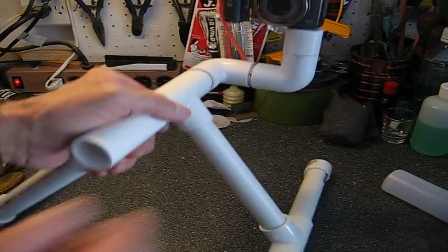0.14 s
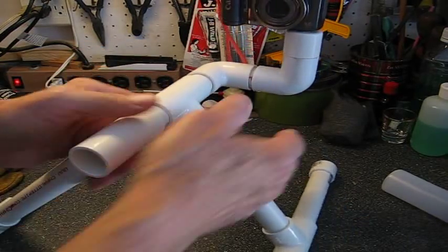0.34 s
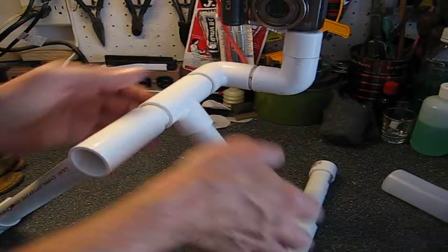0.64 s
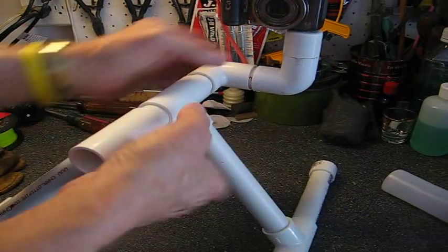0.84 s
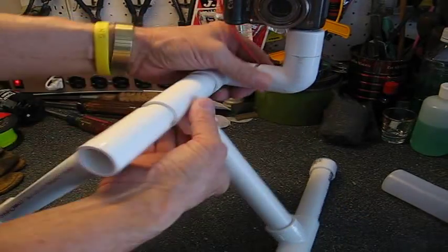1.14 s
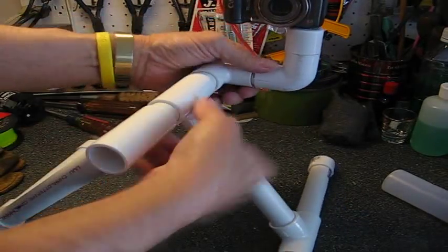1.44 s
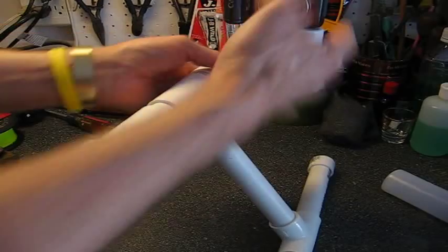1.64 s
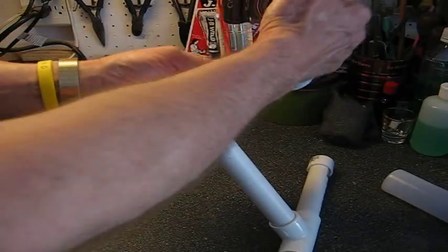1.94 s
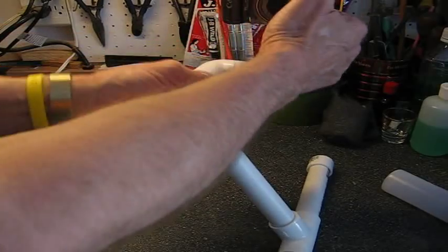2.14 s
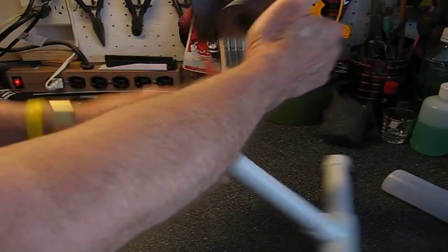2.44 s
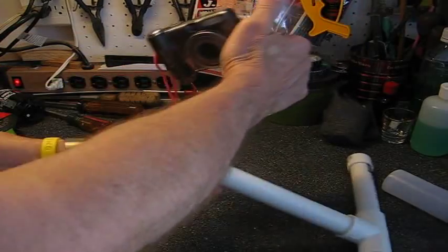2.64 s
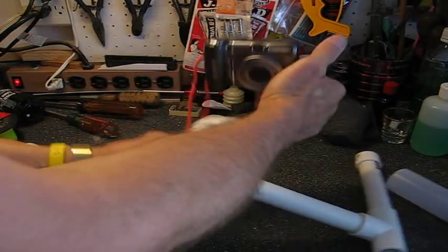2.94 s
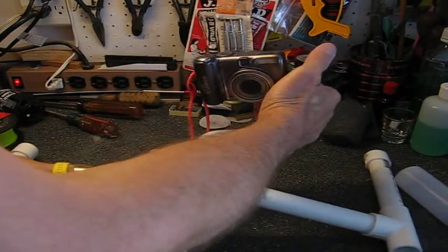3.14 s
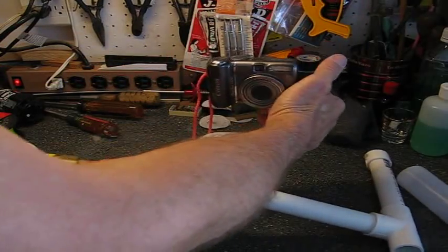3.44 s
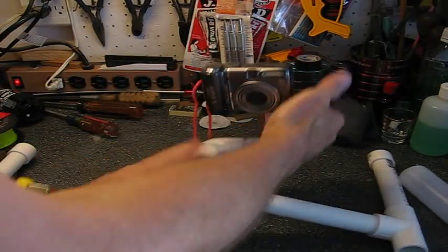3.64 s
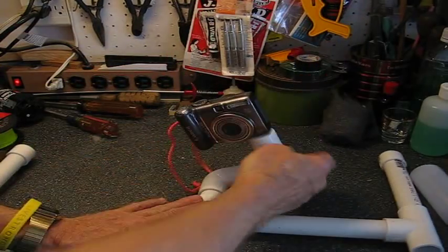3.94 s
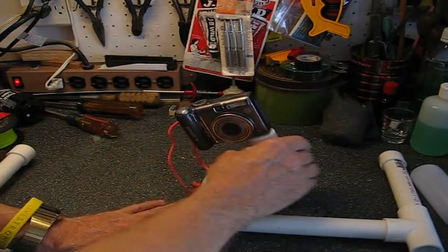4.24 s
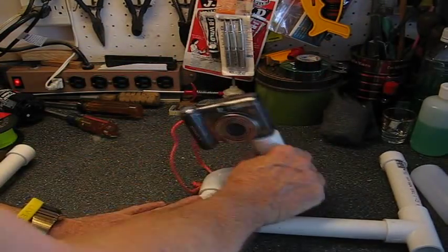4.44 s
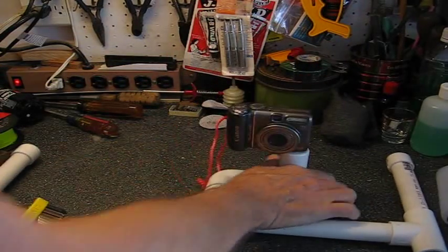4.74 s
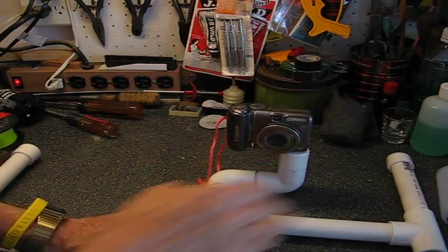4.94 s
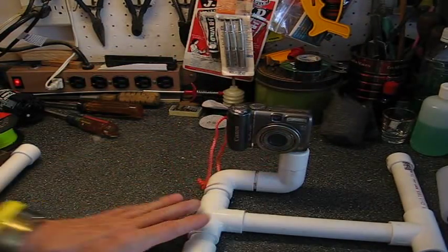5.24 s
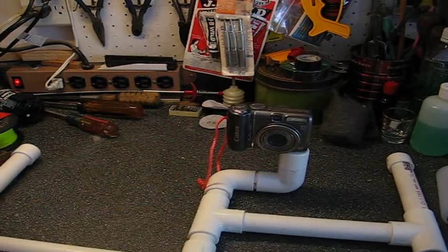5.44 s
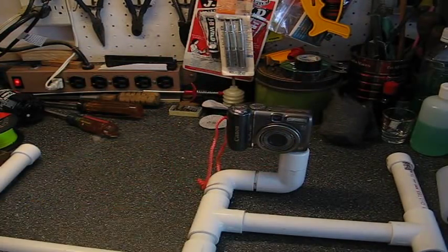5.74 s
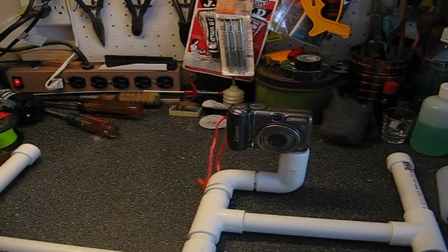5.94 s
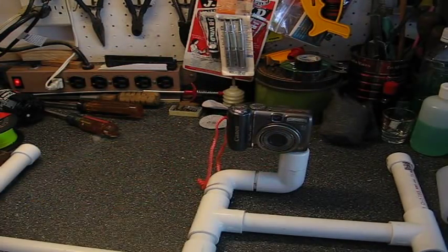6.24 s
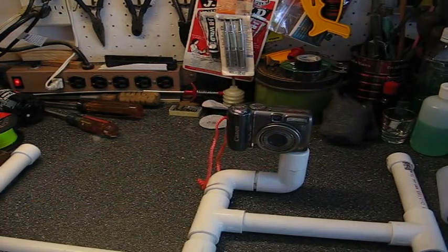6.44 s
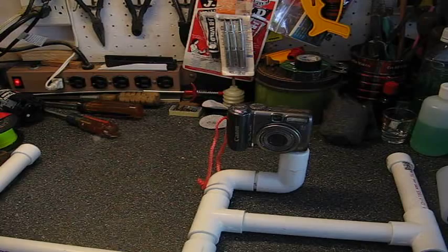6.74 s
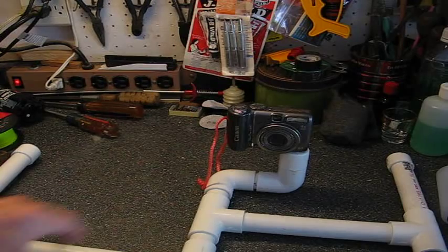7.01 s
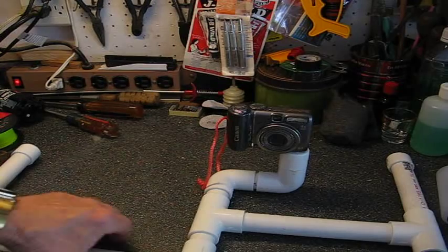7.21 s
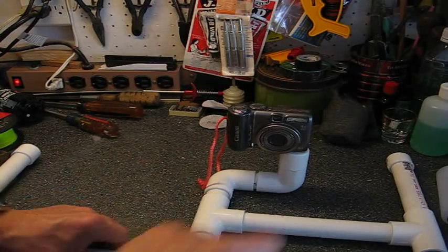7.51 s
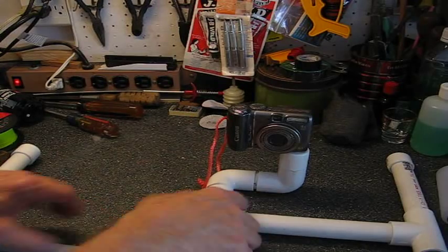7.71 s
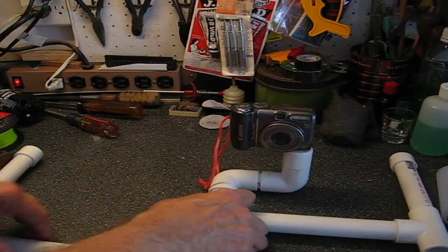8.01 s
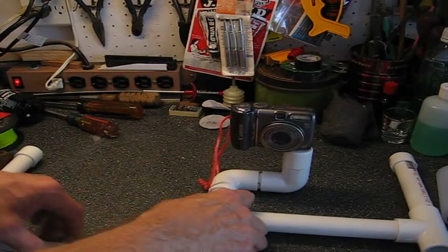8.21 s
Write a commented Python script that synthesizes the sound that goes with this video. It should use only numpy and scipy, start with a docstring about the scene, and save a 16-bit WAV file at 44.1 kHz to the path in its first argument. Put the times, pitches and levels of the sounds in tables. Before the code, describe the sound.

A frame of plastic pipe is handled on a matted workbench, close to the microphone in a small workshop. Ventilation rumbles and hums low throughout. From the start there are light scuffs, joint ticks and hollow knocks, with firmer ones at about 0.4 and 1.8 seconds, each ringing briefly. At 2.5 seconds a heavy drag makes the frame judder and give a short groan, followed by a cluster of clicks, scrapes and knocks around 3 seconds. The two hardest knocks come at 3.9 and 4.7 seconds, each just after a short scrape, bouncing slightly and shaking the bench. Then it is quieter: a light clicking knock near 5.9 seconds, and soft rubs of hands on pipe from about 7 to 8 seconds. The frame is set down with a firm knock at 8.3 seconds.

```python
"""A frame of plastic pipe, carrying a small camera, is gripped and moved on a matted workbench.
From the start it knocks and its joints tick; each knock shakes the bench and rings in the small workshop.
At 2.5 s a heavy drag makes it groan. The hardest knocks, at 3.9 and 4.7 s, are held down by a limiter.
Then come a light knock and soft rubs of hands on pipe, until the frame is set down at 8.3 s.
Ventilation hums throughout."""
import sys
import numpy as np
from scipy import signal
from scipy.fft import rfft, irfft, next_fast_len
from scipy.io import wavfile

SR = 44100
rng = np.random.default_rng(int(sys.argv[2]) if len(sys.argv) > 2 else 0)


def unload_audio(sound):
    """Save the sound as a 16-bit wav file, at the path given as the first command line argument."""
    columns = np.transpose(np.atleast_2d(sound))
    # keep every value between -1 and 1, then stretch to whole-number steps
    steps = np.round(np.clip(columns, -1, 1) * 32767)
    wavfile.write(sys.argv[1], SR, steps.astype(np.int16))


N = 369116
TIME = np.arange(N) / SR


# The frame meets bench or hand: (time [s], force [dB], contact time [ms],
# shaking of frame and bench [dB], note of the struck part [Hz], level of that note [dB])
KNOCK_EVENTS = [(0.165, -22, 0.065, -6, 708, 1), (0.177, -18.5, 0.23, -2, 338, 0),
                (0.299, -29, .15, -6, 686, 4), (0.34, -12.5, 1.4, -9, 185, 3),
                (0.3558, -3, 0.15, 2.5, 1744, -15), (1.176, -20, 0.16, -8.5, 352, -3.5),
                (1.412, -12, 0.35, -5, 358, -1.5), (1.8178, -4, 0.35, 2, 853, -15),
                (1.9456, -16.5, 0.33, -2, 478, 2.5), (2.038, -23.5, 0.77, -4, 342, 3.5),
                (2.325, -19, 0.46, -1, 460, 3), (2.57, -10, 0.09, -7, 1260, -13),
                (2.953, -21, 0.23, -15.5, 152, 4), (3.034, -21, 0.17, -3, 453, -0.5),
                (3.088, -4.5, .075, -9, 800, -8), (3.159, -13.5, 0.18, 0, 196, 2),
                (3.319, -24.5, 0.25, 2, 640, -0.5), (3.815, -19, 0.25, -2, 620, 1.5),
                (3.846, -15, 0.1, 4.5, 491, -10), (3.9355, 5, .09, 1.5, 1281, -15),
                (4.6904, 2.5, 0.15, 5, 262, -8), (5.906, -18.5, 0.024, 1, 725, -1),
                (5.909, -21, .025, -5, 2780, -0.5), (8.043, -22.5, 0.058, -4, 610, -6),
                (8.349, -8, .17, -7, 206, -1.5), (8.3549, -3, 0.093, -0.5, 501, -8)]

def knocks(push_hz=800, push_width_hz=1300, clack_s=0.011, firm_ms=0.21, bass_db_per_doubling=4):
    """Each blow pushes the air and clacks the pipe wall; then struck part, frame and bench ring on."""
    out, t = np.zeros(N), TIME[:SR // 3]
    push = np.exp(-np.pi * push_width_hz * t) * np.sin(2 * np.pi * push_hz * t)
    push = from_db(2) * push / push.max()
    for s, db, contact_ms, shake_db, note_hz, note_db in with_bounces(KNOCK_EVENTS):
        clack = coloured(rng.standard_normal(len(t)), BENCH_COLOUR) * np.exp(-t / clack_s)
        ringing = from_db(-18) * frame_ring(t) + from_db(-8) * bench_ring(t)
        blow = from_db(-7) * clack + from_db(shake_db) * ringing - push
        softness = np.exp(-1000 / (contact_ms * SR))
        blow = signal.lfilter([1 - softness], [1, -softness], blow)  # a longer contact is duller
        bass_db = bass_db_per_doubling * np.log2(contact_ms / firm_ms)  # and has more bass
        blow += (from_db(bass_db) - 1) * butter(blow, 330, "low", order=1)
        note = from_db(note_db) * struck_note(t, note_hz, db)
        add(out, s, from_db(db) * (blow - note))
    return out


def with_bounces(events, hard_db=-3, first_gap_s=.024, gap_shrink=.9, loss_db=8.5):
    """Every knock, plus three bounces after a hard one, each sooner and weaker than the last."""
    for s, db, *touch in events:
        yield (s, db, *touch)
        if db > hard_db:
            for bounce in range(3):
                s += first_gap_s * gap_shrink ** bounce
                db -= loss_db
                yield (s, db, *touch)


def struck_note(t, hz, force_db):
    """The struck part rings with two close tones. The hand damps light taps; hard blows ring longer."""
    ring_s = 0.24 * 2 ** (force_db / 17.5)
    pair = np.sin(2 * np.pi * hz * t) + from_db(-10) * np.sin(2 * np.pi * .78 * hz * t)
    return pair * from_db(-60 * t / ring_s)


# The frame's natural tones: (pitch [Hz], level [dB], time to fade by 60 dB [s])
FRAME_TONES = [(123.4, -1, 0.32), (171.4, -6, 0.35), (201, -6.5, 0.27), (256, -19, 0.16), (320.5, -2, 0.31),
               (367.7, 0.5, 0.31), (433, 0.5, 0.072), (494, 6, 0.24), (670, -1, 0.14), (728, -2, 0.15),
               (808, 3.5, 0.077), (904, -1.5, 0.1), (1240, -17, 0.13), (1270, -19.5, 0.12),
               (1717, -10.5, 0.18), (1900, -17.5, 0.06), (2196, -20, 0.35), (2440, -18, 0.38),
               (3780, -18, 0.15)]

def frame_ring(t, spread_db=2.0):
    """The frame rings. Each tone's strength depends on where it is touched, here left to chance."""
    hz, db, ring_s = np.transpose(FRAME_TONES)[:, :, None]
    strength = from_db(db + spread_db * rng.standard_normal(db.shape)) * rng.choice([-1, 1], db.shape)
    return np.sum(strength * from_db(-60 * t / ring_s) * np.sin(2 * np.pi * hz * t), axis=0)


# Bass-to-treble balance of the bench, also used for the clack: (frequency [Hz], level [dB])
BENCH_COLOUR = [(60, -25), (120, -5.5), (180, -6), (260, 2.5), (500, 1.5), (950, 2.5), (1150, -3),
                (1900, -6), (2600, -5), (3500, -6), (5500, -17), (9000, -20.5)]
# How long bench and workshop ring: (frequency [Hz], time to fade by 60 dB [s])
BENCH_RING_TIMES = [(100, 0.36), (500, 0.34), (1500, 0.34), (4000, 0.21), (9000, 0.35)]

def bench_ring(t):
    """Bench, tools and room ring with so many tones that they blur into fading noise."""
    band_edges_hz = np.geomspace(60, 12000, 7)
    noise = coloured(rng.standard_normal(len(t)), BENCH_COLOUR)
    out = np.zeros(len(t))
    for low, high in zip(band_edges_hz, band_edges_hz[1:]):
        ring_s = at_hz(BENCH_RING_TIMES, np.sqrt(low * high))
        out += butter(noise, [low, high], "band") * from_db(-60 * t / ring_s)
        noise = np.roll(noise, len(t) // 3)  # so neighbouring bands are unalike
    return out


# Joints and fingernails catch, and some knocks add a short, lower crack: (time [s], peak level [dB], pitch
# [Hz], fade time [ms])
TICK_EVENTS = [(0.0642, -26, 3600, 3.8), (0.1747, -18, 4000, 2.3), (0.299, -25, 5300, 5),
               (0.3555, -13, 2400, 2.2), (1.4083, -6, 4100, 0.5), (1.8136, -14.5, 3660, 3.4),
               (1.823, -16.5, 3300, 1.4), (2.556, -16, 4460, 6), (2.57, -18, 1690, 5.6),
               (2.655, -13, 4400, 5), (2.7326, -22, 4350, 16), (2.798, -19.5, 3500, 9.7),
               (2.9463, -25, 3160, 13), (2.99, -22.5, 3940, 0.77), (3.0878, -4, 1600, 1.2),
               (3.1089, -18.5, 3800, 3.2), (3.139, -10.5, 4100, 2.1), (3.167, -18.5, 3670, 5.5),
               (3.234, -27, 2690, 7.3), (3.406, -20.5, 4170, 1.5), (3.545, -30, 3800, 8),
               (3.766, -25, 4470, 1.2), (3.8085, -26, 4370, 6.6), (3.845, -16.5, 3950, 1.3),
               (3.9348, 1.5, 3700, 1.6), (4.691, -4.5, 3200, 0.35), (4.835, -25, 4860, 3.3),
               (5.907, -14, 2770, 3.6), (5.9233, -13, 2900, 3), (5.953, -24.5, 4370, 1.1),
               (7.8977, -25, 3400, 4)]

def ticks(width_hz=2100, room_db=-31, room_s=.025):
    """Each tick is a tiny, hard crunch of noise with a faint tail from the room."""
    out, t = np.zeros(N), TIME[:SR // 5]
    for s, db, hz, fade_ms in TICK_EVENTS:
        fade = np.exp(-1000 * t / fade_ms) + from_db(room_db) * np.exp(-t / room_s)
        crunch = resonate(fade * rng.standard_normal(len(t)), hz, width_hz)
        tick = butter(crunch, 6700, "low", order=3)
        add(out, s, from_db(db) * tick / np.abs(tick).max())
    return out


# Pipe dragged on the mat or rubbed by hand: (start [s], length [s], judder [dB], hiss [dB])
DRAG_STROKES = [(-0.06, .23, -27.5, -35), (0.134, 0.11, -25, -33.5), (0.267, 0.096, -25, -36),
                (1.264, 0.12, -24, -32.5), (2.468, .3, -15, -24), (3.006, 0.21, -21, -30),
                (3.81, 0.14, -18, -26), (4.51, .13, -42, -41), (4.632, .09, -26.5, -34.5),
                (5.87, 0.12, -39, -30), (6.903, 0.42, -48, -42), (7.333, 0.12, -41, -38),
                (7.631, 0.067, -38, -38.5), (7.836, 0.32, -44, -40.5)]
# Bass-to-treble balance of the low judder and of the hiss: (frequency [Hz], level [dB])
JUDDER_COLOUR = [(70, -29), (150, 6.5), (350, 6.5), (550, 1), (900, 0), (1150, -11), (1700, -6.5),
                 (3000, -42), (6000, -33)]
HISS_COLOUR = [(500, -21), (1200, -2), (2000, -2.5), (3600, 0), (5000, -9.5), (7000, -21), (9000, -14)]
# The hollow pipe boosts parts of the hiss: (pitch [Hz], width [Hz], level over the hiss [dB])
PIPE_RESONANCES = [(710, 110, 8.5), (1290, 150, 4.5), (2540, 370, -2), (3630, 340, -9)]

def dragging(grit_db=-15, grit_hz=5100, grit_width_hz=2600):
    """Coarse slips shake the frame, fine ones hiss through the pipe, and stray grit crackles on top."""
    judder_gain, hiss_gain = np.zeros((2, N))
    for start_s, length_s, judder_db, hiss_db in DRAG_STROKES:
        progress = np.clip((TIME - start_s) / length_s, 0, 1)
        hand_speed = np.maximum(np.sin(np.pi * progress), 0)  # speeds up, then slows down
        judder_gain += from_db(judder_db) * hand_speed ** 1.06
        hiss_gain += from_db(hiss_db) * hand_speed ** 0.82
    coarse = slips(per_s=1200, spread_db=-0.5)
    ringing = rms_one(signal.fftconvolve(coarse, frame_ring(TIME[:SR // 4], spread_db=1.5))[:N])
    judder = rms_one(coloured(coarse, JUDDER_COLOUR) + ringing)
    fine = slips(per_s=600, spread_db=2.5)
    hiss = coloured(fine + from_db(-3) * rng.standard_normal(N), HISS_COLOUR)
    hollow = sum(from_db(db) * resonate(hiss, hz, width) for hz, width, db in PIPE_RESONANCES)
    grit = rms_one(resonate_twice(slips(per_s=320, spread_db=1.5), grit_hz, grit_width_hz))
    return judder_gain * judder + hiss_gain * (rms_one(hiss + hollow) + from_db(grit_db) * grit)


def slips(per_s, spread_db):
    """Surfaces stick and let go: clicks of uneven size at random moments."""
    sizes = from_db(spread_db * np.minimum(rng.exponential(1, N), 4)) * rng.choice([-1, 1], N)
    return rms_one(sizes * (rng.random(N) < per_s / SR))


# The tones in the frame's groan: (pitch [Hz], relative level [dB])
GROAN_TONES = [(170, -3), (199, 5), (318, -4), (364, -6.5), (488, 0.5)]

def groan(start_s=2.54, rise_s=0.041, hold_s=0.035, fall_db_per_s=170, level_db=-11.5):
    """In the heaviest drag the slips lock on to a few of the frame's tones, which sing unsteadily."""
    t = TIME - start_s
    rise = np.clip(t / rise_s, 0, 1)
    fall_db = fall_db_per_s * np.maximum(t - rise_s - hold_s, 0)
    voice = np.zeros(N)
    for hz, db in GROAN_TONES:
        pitch_hz = hz * (1 + 0.022 * waver(rate_hz=28))
        flutter_db = 5.5 * waver(rate_hz=20)
        voice += from_db(db + flutter_db) * np.sin(2 * np.pi * np.cumsum(pitch_hz) / SR)
    return rise * from_db(level_db - fall_db) * rms_one(voice)


# Bass-to-treble balance of the ventilation's rumble and airy hiss: (frequency [Hz], level [dB])
RUMBLE_COLOUR = [(8, -4), (18, -5), (27, 6), (33, -11), (42, -10.5), (62, -7), (85, -6), (105, -16.5),
                 (130, -12.5), (150, -24.5), (220, -56)]
AIR_COLOUR = [(82, -39), (140, -7.5), (188, -4), (276, -7.5), (346, -9), (412, -9), (554, -13), (813, -13),
              (887, -14), (1040, -17.5), (1350, -19), (3110, -21), (5530, -34), (7690, -55.5),
              (9000, -58.5), (11700, -85), (19800, -120)]
# Slow swell and sinking of the airy hiss as moving arms and sleeves rustle, scaled down by drift_share: (time
# [s], relative level [dB])
AIR_DRIFT = [(0.0, -36), (0.7, -39), (2.33, -39), (2.58, -38.5), (6.34, -42), (8.37, -39.5)]
# The fan's hums: (pitch [Hz], width [Hz], level [dB])
FAN_HUMS = [(84.2, 11.2, -32.5), (281, 15, -45.5), (713, 7.5, -61.5), (1857, 6, -56.5), (5500, 77, -73)]

def ventilation(rumble_db=-23.5, air_db=-34, drift_share=0.67):
    """Moving air rumbles and hisses, and the fan adds a few wavering hums."""
    s, db = np.transpose(AIR_DRIFT)
    drift_db = drift_share * np.interp(TIME, s, db - np.median(db))
    out = from_db(rumble_db) * coloured(rng.standard_normal(N), RUMBLE_COLOUR)
    out += from_db(air_db + drift_db) * coloured(rng.standard_normal(N), AIR_COLOUR)
    for hz, width, hum_db in FAN_HUMS:
        hum = resonate_twice(rng.standard_normal(N + SR), hz, 2 * width)[SR:]  # skip the build-up
        out += from_db(hum_db) * rms_one(hum)
    return out


def from_db(db):
    """Turn decibels into a number to multiply by."""
    return 10 ** (np.asarray(db) / 20)


def rms_one(x):
    """Scale a sound so its average strength (rms) is 1."""
    return x / np.sqrt(np.mean(x ** 2) + 1e-20)


def at_hz(points, hz):
    """Read between a table's rows, with octaves evenly spaced."""
    known_hz, values = np.transpose(points)
    return np.interp(np.log(hz + 1e-3), np.log(known_hz), values)


def butter(x, hz, kind, order=2):
    """Keep the lows, the highs or a band; a higher order cuts more sharply."""
    sections = signal.butter(order, np.clip(hz, 10, .45 * SR), kind, fs=SR, output="sos")
    return signal.sosfilt(sections, x + 1e-18)


def coloured(x, colour):
    """Give a noise a bass-to-treble balance, at an average strength of 1."""
    size = next_fast_len(len(x))
    gains = from_db(at_hz(colour, np.fft.rfftfreq(size, 1 / SR)))
    return rms_one(irfft(rfft(x, size) * gains, size)[:len(x)])


def resonate(x, hz, width_hz):
    """Let through what lies near one pitch and weaken the rest."""
    r = np.exp(-np.pi * width_hz / SR)
    feedback = [1, -2 * r * np.cos(2 * np.pi * hz / SR), r * r]
    return signal.lfilter(np.array([1, 0, -1]) * (1 - r * r) / 2, feedback, x)


def resonate_twice(x, hz, width_hz):
    """Pick out one pitch more sharply."""
    return resonate(resonate(x, hz, width_hz), hz, width_hz)


def waver(rate_hz):
    """A slow random wobble with a typical size of 1."""
    return rms_one(butter(rng.standard_normal(N), rate_hz, "low"))


def add(out, s, sound):
    """Mix a sound in at s seconds."""
    start = max(round(s * SR), 0)
    out[start:start + len(sound)] += sound[:max(N - start, 0)]


def scene():
    """Everything reaches one close microphone."""
    return (knocks() + ticks() + dragging() + groan() + ventilation())[None]


def limiter(x, ceiling_db=-10.5, attack_s=.006, release_db_per_s=170):
    """Turn loud moments down within milliseconds, then quickly let the volume back up."""
    lag = np.exp(-1 / (attack_s * SR))
    level_db = 10 * np.log10(signal.lfilter([1 - lag], [1, -lag], x ** 2) + 1e-12)
    over_db = np.maximum(level_db - ceiling_db, 0)
    release_db = release_db_per_s * TIME
    cut_db = np.maximum.accumulate(over_db + release_db, axis=-1) - release_db
    return x * from_db(-cut_db)


def record(dry, band_hz=7800, mirror_db=-15, cutoff_hz=16000):
    """The recorder limits and clips peaks; its half-rate converter faintly mirrors the treble upwards."""
    clipped = np.clip(limiter(dry), -.88, .88)
    x = butter(clipped, band_hz, "low", order=13)
    treble = butter(x, 6000, "high", order=6)
    mirrored = treble * (-1) ** np.arange(N)  # moves each frequency f to SR / 2 - f
    return butter(x + from_db(mirror_db) * mirrored, cutoff_hz, "low", order=20)


dry = scene()
out = record(dry)
unload_audio(out)
```